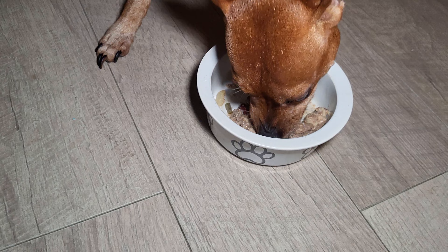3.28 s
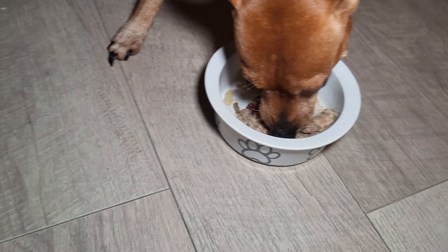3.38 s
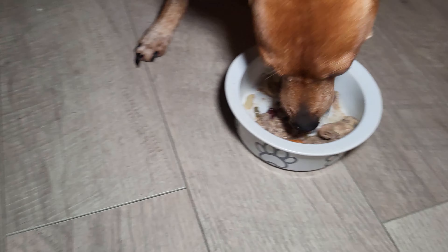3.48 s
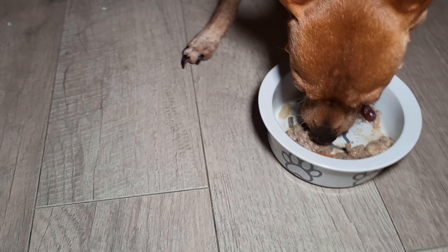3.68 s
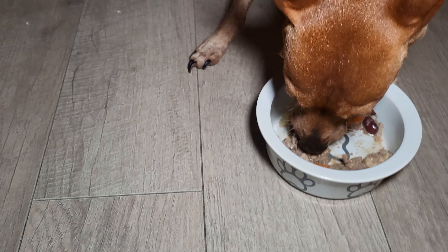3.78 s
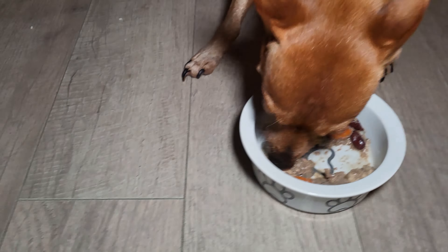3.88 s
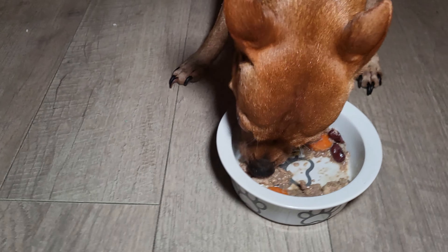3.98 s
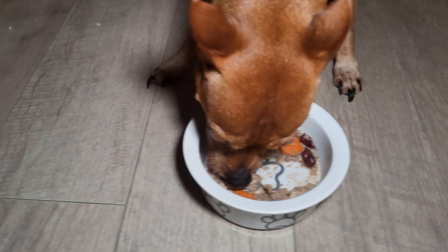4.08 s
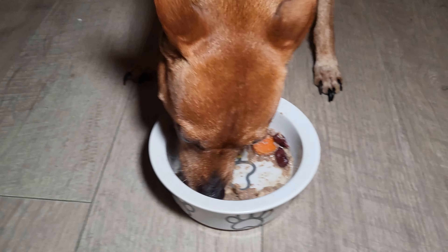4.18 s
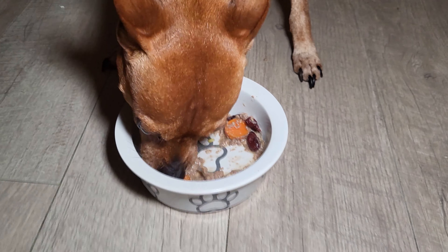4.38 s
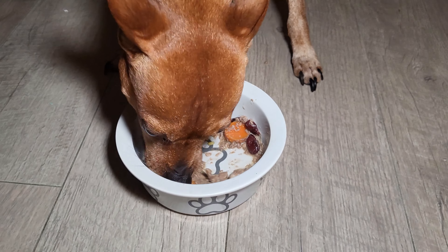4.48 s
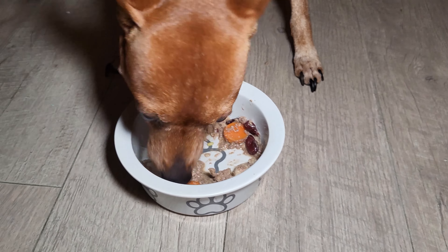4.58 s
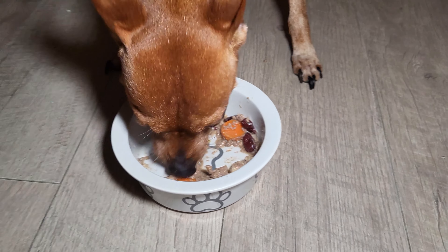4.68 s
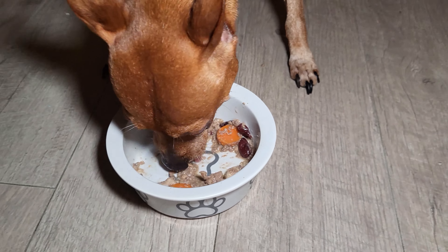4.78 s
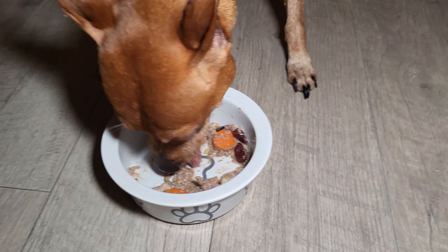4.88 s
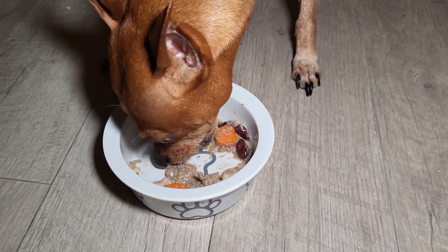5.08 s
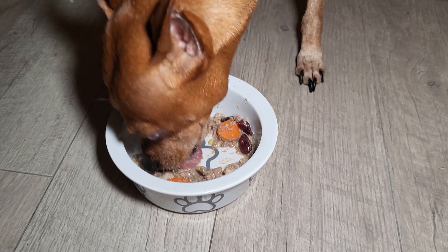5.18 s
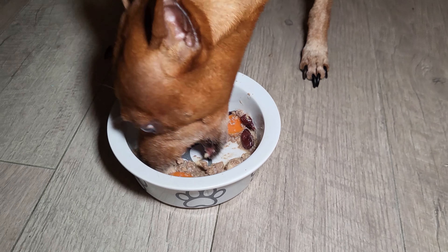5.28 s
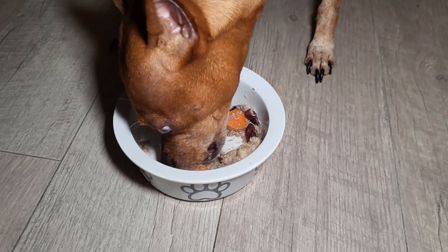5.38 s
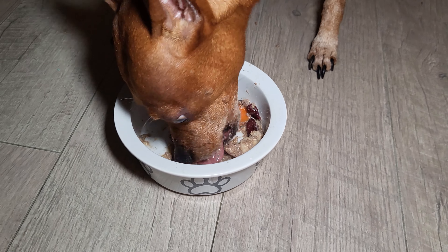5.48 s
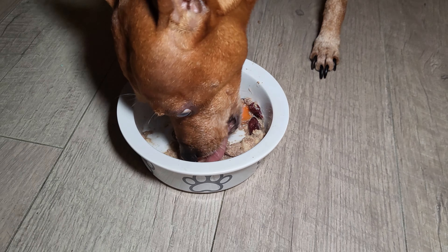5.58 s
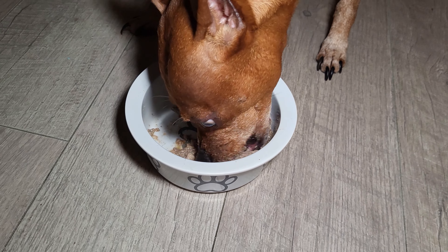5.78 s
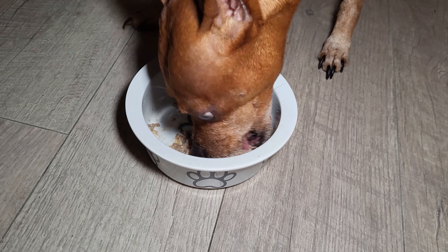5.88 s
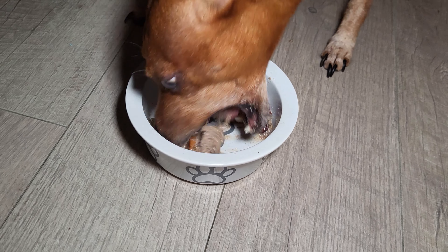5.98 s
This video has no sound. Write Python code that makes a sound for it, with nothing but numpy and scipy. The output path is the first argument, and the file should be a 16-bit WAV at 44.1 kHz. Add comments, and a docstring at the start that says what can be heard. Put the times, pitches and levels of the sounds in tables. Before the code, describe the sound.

Inside a bare, quiet room with a soft wavering hum, a little dog laps up moist food near the microphone. A sharp ceramic and floor clunk opens, followed by juicy mouthfuls, sticky clicks and popping air pockets in irregular rhythm. The bowl scrapes briefly past two seconds and taps faintly later. Eating continues to the end, close and detailed, with a short room tail.

```python
"""A low wavering hum, then at once the wet squelch of a small dog eating soft food from a ceramic bowl, close up.
Fizzing, bubbling mouthfuls come about five a second; films of saliva tick and air pockets pop as chirps.
The pushed bowl judders over the hard floor as sparse jolts, rings faintly and knocks with its foot.
Noise shaped by spectra makes the hum and mash; a bare room answers all but the hum, into two microphone ports."""
import sys
import numpy as np
from scipy import signal
from scipy.fft import rfft, irfft
from scipy.io import wavfile
from scipy.ndimage import uniform_filter1d

SR = 44100
rng = np.random.default_rng(int(sys.argv[2]) if len(sys.argv) > 2 else 0)


def unload_audio(sound):
    """Save the sound as a 16-bit wav file, at the path given as the first command line argument."""
    columns = np.transpose(np.atleast_2d(sound))
    # keep every value between -1 and 1, then stretch to whole-number steps
    steps = np.round(np.clip(columns, -1, 1) * 32767)
    wavfile.write(sys.argv[1], SR, steps.astype(np.int16))


N = 265923

# low room noise, spectrum shape: f/Hz, level/dB per Hz
HUM_SPECTRUM = [(12, -51), (20, -34), (70, 1), (107, -7), (206, -9.5), (384, -19.5), (797, -25),
                (1070, -26.5), (1370, -42.5), (1950, -37.5), (3260, -66), (3740, -52), (8200, -44.5),
                (13000, -54)]
HUM_NOISE_DB = -51.5
# fuzzy hum tones: f/Hz, width/Hz, level/dB
HUM_TONES = [(60.5, 5.8, -58), (102.4, 20.5, -50), (161.5, 24, -59.5)]
# wet mouthfuls: full at t/s, held t/s, fizz level/dB, squelch level/dB (before the lumps)
BITES = [(0.067, .13, -52, -47), (0.438, .06, -45.5, -40.5), (0.669, 0.084, -51.5, -54.5),
         (0.878, 0.01, -59, -55.5), (1.03, .13, -64.5, -64), (1.212, 0.015, -61.5, -72),
         (1.35, .02, -64, -61.5), (1.433, 0.0058, -49.5, -52.5), (1.57, 0.019, -63, -72),
         (1.909, 0.0071, -61.5, -59), (2.029, 0.033, -57, -55.5), (2.24, 0.016, -65.5, -72),
         (2.348, 0.027, -49, -43.5), (2.56, 0.014, -61.5, -81), (2.64, 0.044, -53.5, -52.5),
         (2.82, .05, -62, -72), (2.981, 0.015, -48.5, -50.5), (3.148, 0.013, -61, -64.5),
         (3.31, 0.14, -63, -65), (3.52, 0.033, -69, -69), (3.656, 0.02, -47.5, -49.5),
         (3.898, 0.11, -46, -47.5), (4.201, .04, -63.5, -63.5), (4.303, 0.0067, -53.5, -52),
         (4.419, .03, -56, -49.5), (4.58, 0.066, -58.5, -63), (4.742, 0.057, -53, -49.5),
         (5.07, 0.018, -53.5, -60), (5.19, 0.046, -64.5, -65), (5.392, 0.12, -58.5, -55.5),
         (5.753, 0.013, -59.5, -60.5), (5.888, 0.02, -55, -58)]
BITE_RISE_S, BITE_RISE_PER_HELD = 0.025, 0.26
FIZZ_FALL_DB_PER_S, SQUELCH_FALL_DB_PER_S = 122, 111
LUMP_DB, LUMP_S = 2.5, 0.014  # the mash gives way unevenly
# fine fizz, spectrum shape: f/Hz, level/dB per Hz
FIZZ_SPECTRUM = [(1470, -32), (2500, 2), (2790, 1.5), (3010, 2.5), (4760, 2), (6010, -1), (8460, 1.5),
                 (9660, -7), (14000, -11), (16000, -12)]
# squelch in the mouth, spectrum shape: f/Hz, level/dB per Hz
SQUELCH_SPECTRUM = [(500, -13.5), (900, 7), (1200, 8), (1550, 4.5), (2000, 12.5), (2500, 5), (4000, -1),
                    (6000, -19)]
# films of saliva tearing: t/s, peak level/dB, centre f/Hz
TICKS = [(0.084, -29, 5100), (0.166, -27.5, 4540), (0.392, -46, 8150), (0.401, -31, 5540),
         (0.804, -34, 7000), (0.866, -33, 6200), (0.997, -40, 4760), (1.208, -37.5, 5650),
         (1.342, -42.5, 7140), (1.4275, -32, 5660), (1.437, -30, 8200), (1.8996, -33.5, 6940),
         (2.0173, -36.5, 6300), (2.124, -45, 7200), (2.5483, -36.5, 5510), (2.5556, -40, 7400),
         (2.6287, -21.5, 4830), (2.631, -23, 11600), (2.716, -38, 6400), (2.81, -42, 4800),
         (2.859, -41, 4620), (2.9676, -34, 6700), (3.042, -38.5, 4750), (3.169, -44.5, 4900),
         (3.3602, -44, 4230), (3.4052, -32, 9200), (3.576, -49, 7900), (3.6417, -22.5, 8350),
         (3.969, -35, 6040), (4.258, -41, 9200), (4.3016, -30, 6200), (4.3795, -35, 6130),
         (4.4238, -43, 5500), (4.5647, -35, 5330), (4.725, -37, 7600), (4.733, -24, 6940),
         (5.0563, -27, 5400), (5.1307, -31.5, 5700), (5.384, -31, 8300), (5.462, -44, 7000),
         (5.487, -39, 8580), (5.848, -42.5, 4450), (5.746, -38.5, 3700)]
TEAR_MS = 4.2
# the bowl dragged over the floor: full at t/s, held t/s, level/dB, ceramic ring level/dB re the push
PUSHES = [(0.109, .03, -25.5, -2.5), (.425, 0.076, -29, 1.5), (0.854, 0.013, -46.5, -6),
          (2.314, 0.02, -28, 1), (2.39, 0.038, -41.5, 1), (2.673, 0.0043, -38.5, -6),
          (3.655, 0.058, -52.5, 4), (3.868, 0.056, -51, -18), (4.533, 0.0049, -42.5, 0.5),
          (4.756, 0.018, -40.5, -18), (5.419, 0.011, -44.5, -4), (5.873, 0.047, -41.5, -12)]
PUSH_RISE_S, PUSH_RISE_PER_HELD, PUSH_FALL_DB_PER_S = 0.012, 0.3, 355
# floor boards under the bowl, spectrum shape: f/Hz, level/dB per Hz
BOARD_SPECTRUM = [(71, -23), (120, -5), (144, -15), (316, 6), (474, 2.5), (1300, -16), (1560, -19.5),
                  (2860, -23), (3870, -19.5), (4460, -31.5), (15000, -67)]
# ceramic modes: f/Hz, width/Hz, level/dB re the ringing
BOWL_MODES = [(1575, 25, -16), (2270, 65, -28), (3860, 60, -21), (5720, 120, -23), (8200, 200, -30)]
# foot of the bowl on the floor: t/s, peak level/dB before port gain, starting f/Hz, cycles, room level/dB
KNOCKS = [(.102, -36, 590, 2.8, -11), (0.1164, -9.5, 696, 1.9, -11), (.133, -14.5, 640, 1.43, -0.5),
          (0.242, -39, 830, 1.4, -20), (2.322, -24.5, 396, 1.7, 5), (4.534, -28, 338, 1.3, -15.5),
          (4.546, -30.5, 297, 1.3, -5), (4.767, -31.5, 313, 1.2, -15), (5.898, -26, 420, 1.6, -21)]
# air pockets popping in the mouth: columns as KNOCKS (under 0.6 cycles the pitch starts below f)
POPS = [(0.361, -44, 1130, 3.1, 5), (0.372, -39.5, 1910, 5.6, -16), (0.868, -35, 930, 3.5, 0),
        (0.869, -37, 2200, 4.6, -9), (0.983, -44.5, 1180, 2, 5), (1.169, -37, 1030, 2.1, 4),
        (1.197, -44, 1880, 5.4, 6), (1.335, -42, 780, 4.9, -7), (1.367, -31, 930, 0.79, 2),
        (1.427, -29, 2180, 3.3, -2), (1.442, -25.5, 790, 0.68, -3), (1.565, -21.5, 1620, 2.16, 3),
        (1.581, -23, 1740, 3, -7), (1.996, -36.5, 1600, 1.9, 6), (2.023, -27.5, 1130, 3.4, -1.5),
        (2.248, -44, 1860, 3.8, 0.5), (2.629, -32, 760, 1.5, 1), (2.745, -36, 1220, 2.7, 4),
        (2.969, -32.5, 940, 0.84, 6), (3.043, -40, 1850, 9.5, -4), (3.387, -40, 2820, 5.4, 3),
        (3.643, -28.5, 770, 2.2, -3), (3.6438, -22, 3210, 2.6, 3), (3.97, -29, 860, 2.3, -1),
        (4.35, -36, 1370, 1.2, -8), (4.381, -21, 1860, 1.9, -5.5), (4.439, -42, 1420, 2, 15),
        (4.453, -25, 1540, 1.14, -6), (4.567, -27, 2470, 3.6, -13), (4.727, -25.5, 2070, 1.9, 1),
        (4.731, -21, 2080, 0.48, -8), (4.788, -28, 1135, 3.7, 0), (5.06, -26.5, 1060, 0.72, 0),
        (5.139, -37, 1670, 7.8, -1.5), (5.188, -33.5, 1620, 1.2, -6), (5.238, -46, 1310, 6.6, 2),
        (5.384, -42.5, 1090, 4.7, 1), (5.486, -40, 940, 3, -8), (5.745, -43, 850, 3.7, 3.5),
        (5.783, -44, 3600, 14, -6), (5.977, -41, 1910, 4.6, -1)]
# decay of the room: f/Hz, t60/s
ROOM_DECAY = [(300, 0.33), (800, 0.58), (2000, 0.42), (5500, 0.39), (12000, 0.22)]
# nearest surfaces: t/s, level/dB before the echo send
ECHOES = [(.0055, -0.5), (0.0161, -2.5), (0.027, -25)]
BUILD_S = 0.0053  # time constant of the diffuse tail filling in
# left-right likeness: f/Hz, correlation
LIKENESS = [(25, .86), (120, .92), (290, .86), (640, .6), (1200, .2), (4000, .03), (15000, 0)]
# colour of the two ports: f/Hz, left-right level/dB
PORT_COLOUR = [(60, 1), (150, 1), (380, 1), (950, 1.5), (2380, 1), (5980, 0), (15000, -3.5)]
EDGE_HZ = 15950


def gain_of(db):
    """Decibels to a factor."""
    return 10 ** (np.asarray(db) / 20)


def evened(x):
    """Scales to rms 1."""
    return x / np.sqrt(np.mean(x ** 2) + 1e-20)


def read(points, hz):
    """Reads a table on a log-frequency axis."""
    f, value = np.transpose(points)
    return np.interp(np.log(hz + 1), np.log(f + 1), value)


def add(mix, s, sound):
    """Mixes a sound in at a time."""
    part = mix[..., round(s * SR):][..., :sound.shape[-1]]
    part += sound[..., :part.shape[-1]]


def pair(a, b):
    """Spreads over two ports: their likeness follows frequency, high in the bass and none at the top."""
    same = np.clip(read(LIKENESS, np.fft.rfftfreq(N, 1 / SR)), -1, 1)
    right = same * rfft(a) + np.sqrt(1 - same ** 2) * rfft(b)
    return np.array([a, irfft(right, N)])


def resonate(x, hz, width):
    """One narrow resonance of rms 1."""
    return evened(signal.lfilter(*signal.iirpeak(hz, hz / width, SR), x))


def grains(points, per_s, spread_db, smooth):
    """Sparse clicks of uneven size over smooth noise, coloured causally by a spectrum."""
    struck = rng.random(N) < per_s / SR
    size = gain_of(spread_db * np.minimum(rng.exponential(1, N), 4)) * struck
    drive = evened(size * rng.standard_normal(N)) + smooth * rng.standard_normal(N)
    level_db = np.maximum(read(points, abs(np.fft.fftfreq(4096, 1 / SR))), -100)
    # minimum phase: no sound before its click
    spectrum = np.exp(np.conj(signal.hilbert(np.log(gain_of(level_db)))))
    taps = np.fft.ifft(spectrum).real[:2048]
    return evened(signal.oaconvolve(drive, taps)[:N]), drive


def stroke(s, held, db, rise, fall_db_per_s):
    """A level that swells 20 dB per rise time, holds, then dies away evenly in dB."""
    t = np.arange(N) / SR - s
    swell_db = 20 * np.minimum(t, 0) / max(rise, .003)
    fall_db = fall_db_per_s * np.maximum(t - held, 0)
    return gain_of(db + swell_db - fall_db)


def pop(db, hz, cycles, glide, rise):
    """A few cycles that swell, rise in pitch as the pocket closes, and die."""
    u = np.arange(900) / SR * hz / max(cycles, .6)
    swell = u ** rise * np.exp(-4.5 * u)
    wave = swell * np.sin(2 * np.pi * cycles * (u + glide * u ** 2))
    return gain_of(db) * wave / abs(wave).max()


def strikes(rows):
    """Short rising chirps a touch stronger and later at the left port, with their room send."""
    near, sent = np.zeros((2, N)), np.zeros((2, N))
    for s, db, hz, cycles, room_db in rows:
        sound = pop(db, hz, cycles, glide=.08, rise=1.2)
        add(near[0], s + rng.uniform(0, .00012), gain_of(2.5) * sound)
        add(near[1], s, gain_of(0.5) * sound)
        add(sent, s, gain_of(room_db) * sound)
    return near, sent


def hum():
    """Low room noise with three narrow resonances of noise as fuzzy, wavering tones."""
    gain = gain_of(read(HUM_SPECTRUM, np.fft.rfftfreq(N, 1 / SR)))
    noise = irfft(gain * rfft(rng.standard_normal((2, N))), N)
    air = gain_of(HUM_NOISE_DB) * evened(noise)
    for hz, width, db in HUM_TONES:
        tone = resonate(rng.standard_normal((2, N)), hz, width)
        air = air + gain_of(db) * resonate(tone, hz, width)
    return pair(*air)


def jaw(s, held, fizz_db, squelch_db):
    """Levels of one mouthful: the longer it is held, the slower it swells."""
    rise = BITE_RISE_S + BITE_RISE_PER_HELD * held
    return np.array([stroke(s, held, fizz_db, rise, FIZZ_FALL_DB_PER_S),
                     stroke(s, held, squelch_db, rise, SQUELCH_FALL_DB_PER_S)])


def bubbles(lo_hz, hi_hz, per_s, cycles):
    """Tiny random pops at 16 pitches and uneven sizes."""
    out = np.zeros(N)
    for hz in np.geomspace(lo_hz, hi_hz, num=16):
        burst = rng.random(N) < per_s / 16 / SR
        size = gain_of(4 * np.minimum(rng.exponential(1, N), 3)) * burst
        out += signal.oaconvolve(size, pop(0, hz, cycles, glide=0.086, rise=1))[:N]
    return evened(out)


def chewing():
    """Fine fizz and coarser squelch follow the jaw, both strewn with bubbles."""
    fizz_level, squelch_level = np.sqrt(sum(jaw(*row) ** 2 for row in BITES))
    fizz = pair(*[grains(FIZZ_SPECTRUM, per_s=700., spread_db=3, smooth=1.6)[0] for port in "LR"])
    squelch = pair(*[grains(SQUELCH_SPECTRUM, per_s=500., spread_db=3, smooth=1.4)[0] for port in "LR"])
    fizz = fizz + gain_of(-13) * bubbles(4000, 11000, per_s=90, cycles=7)
    squelch = squelch + gain_of(-8) * bubbles(900, 3200, per_s=80, cycles=5)
    size = max(round(LUMP_S * SR), 2)
    wander = uniform_filter1d(rng.standard_normal((2, N)), size)
    lumps = gain_of(LUMP_DB * evened(uniform_filter1d(wander, size)))
    return fizz_level * lumps[0] * fizz + squelch_level * lumps[1] * squelch


def tear(db, hz, ms, spread, chance):
    """A clump of uneven crackles in a wide band that builds and dies, other at each port."""
    u = np.arange(chance.shape[-1]) / SR * 1000 / max(ms, .3)
    edges = np.clip([hz / spread, hz * spread], 500, 18000)
    crackles = u ** 2 * np.exp(-3.0 * u) * chance * abs(chance)
    wave = signal.sosfilt(signal.butter(2, edges, "band", fs=SR, output="sos"), crackles)
    return gain_of(db) * wave / abs(wave).max()


def saliva_ticks():
    """Films of saliva tear into crackles, with their room send."""
    near, sent = np.zeros((2, N)), np.zeros((2, N))
    for s, db, hz in TICKS:
        sound = tear(db, hz, TEAR_MS, spread=1.55, chance=rng.standard_normal((2, 2500)))
        start = s - 0.42 * TEAR_MS / 1000  # the first crackles are faint
        add(near, start, sound)
        add(sent, start, gain_of(-4.5) * sound)
    return near, sent


def dragged_bowl():
    """Stick-slip jolts shake the boards and ring the ceramic."""
    level, ringing = np.zeros(N), np.zeros(N)
    for s, held, db, ring_db in PUSHES:
        push = stroke(s, held, db, PUSH_RISE_S + PUSH_RISE_PER_HELD * held, PUSH_FALL_DB_PER_S)
        level += push
        ringing += gain_of(ring_db) * push
    boards, jolts = grains(BOARD_SPECTRUM, per_s=500., spread_db=2, smooth=.8)
    other_boards, _ = grains(BOARD_SPECTRUM, per_s=500., spread_db=2, smooth=.8)
    ring = sum(gain_of(db) * resonate(jolts * ringing, hz, width) for hz, width, db in BOWL_MODES)
    return pair(boards, other_boards) * level + ring * np.sqrt(np.mean(ringing ** 2))


def bowl_knocks():
    """The foot of the bowl knocks on the floor: low, short chirps of a cycle or three."""
    return strikes(KNOCKS)


def mouth_pops():
    """Pockets of air pop in the mouth: chirps that rise as each pocket closes."""
    return strikes(POPS)


def room(x, tail_db, echo_db):
    """A few strong echoes, then sparse taps of random sign, each band dying at its own speed."""
    taps = np.zeros((2, SR))
    at = np.arange(300, SR - 20, 20) + rng.integers(0, 20, (2, (SR - 301) // 20))
    np.put_along_axis(taps, at, rng.choice([-1., 1.], at.shape), 1)
    hz, t, bands = signal.stft(taps, SR, nperseg=256)
    decay = gain_of(-60 * t / read(ROOM_DECAY, hz)[:, None])
    build = 1 - np.exp(-t / BUILD_S)
    tail = signal.istft(bands * decay * build, SR, nperseg=256)[1]
    tail = gain_of(tail_db) * tail / np.linalg.norm(tail[0])
    for s, db in ECHOES:
        add(tail, s, gain_of(db + echo_db) * np.ones((2, 1)))
    wet = signal.fftconvolve(x.mean(0)[None], tail, axes=1)[:, :N]
    return pair(*wet)


def scene():
    """Layers the sources, direct and through the room, over the hum."""
    mash = chewing()
    ticks, ticks_sent = saliva_ticks()
    bowl = dragged_bowl()
    knocks, knocks_sent = bowl_knocks()
    pops, pops_sent = mouth_pops()
    smacks = ticks + knocks + pops
    smacks_sent = ticks_sent + knocks_sent + pops_sent
    return (hum() + mash + room(mash, tail_db=-13.0, echo_db=-43.0)
            + smacks + room(smacks_sent, tail_db=-2.5, echo_db=-8.0)
            + bowl + room(bowl, tail_db=-5.5, echo_db=-14.5))


def record(dry):
    """Colours the two ports oppositely, then cuts everything above the band edge."""
    tilt_db = read(PORT_COLOUR, np.fft.rfftfreq(N, 1 / SR)) / 2
    coloured = irfft(rfft(dry) * gain_of([tilt_db, -tilt_db]), N)
    low_pass = signal.firwin(511, EDGE_HZ, window=("kaiser", 9), fs=SR)
    return signal.oaconvolve(coloured, low_pass[None], "same")


dry = scene()
out = record(dry)
unload_audio(out)
```